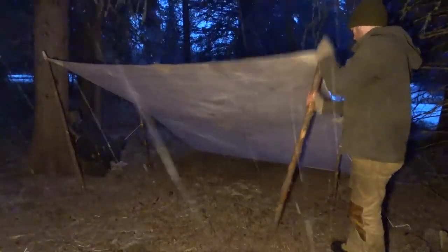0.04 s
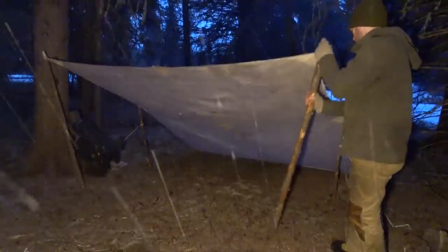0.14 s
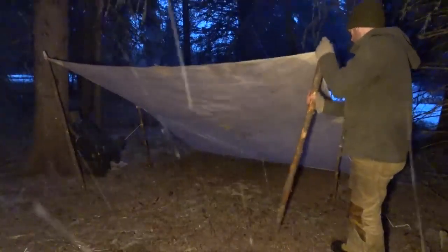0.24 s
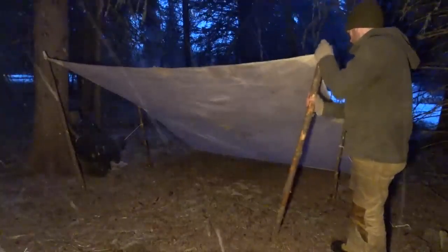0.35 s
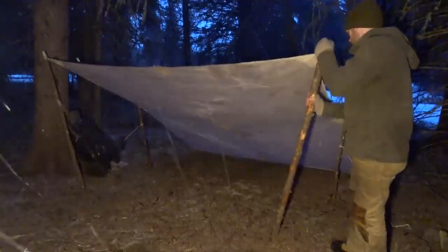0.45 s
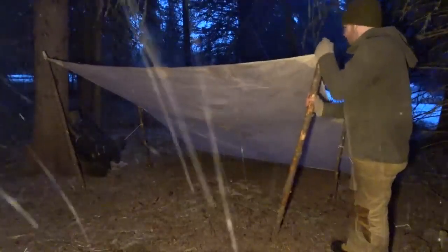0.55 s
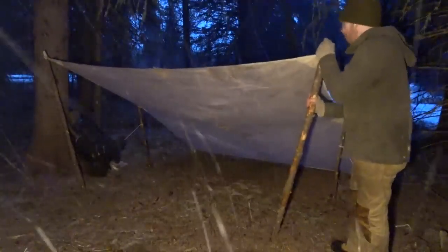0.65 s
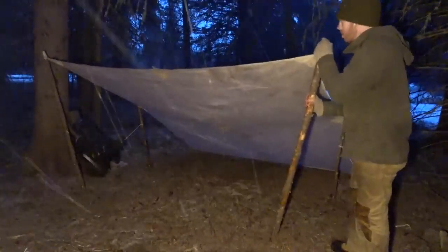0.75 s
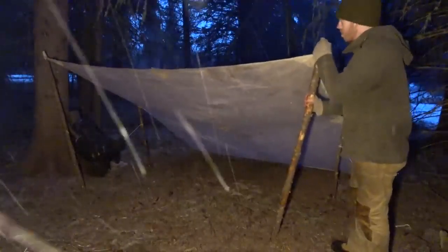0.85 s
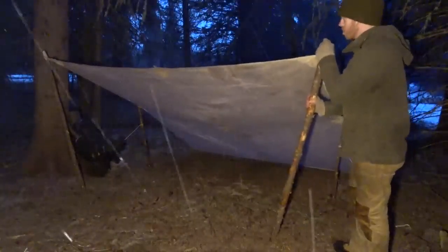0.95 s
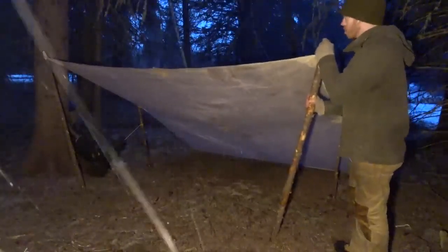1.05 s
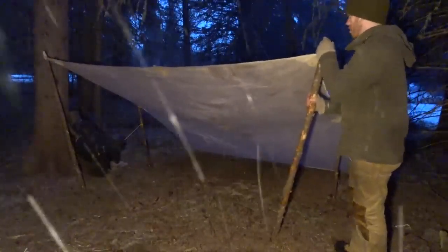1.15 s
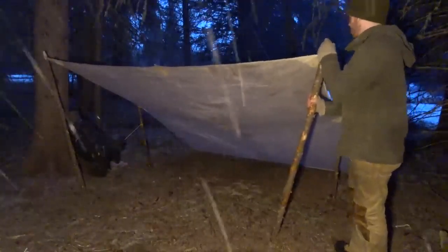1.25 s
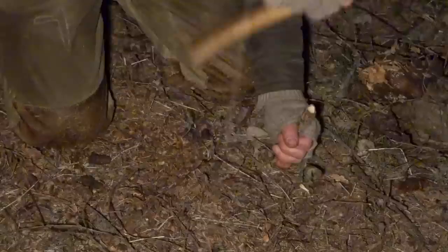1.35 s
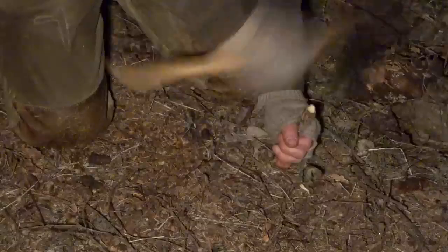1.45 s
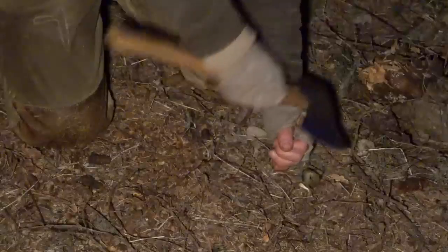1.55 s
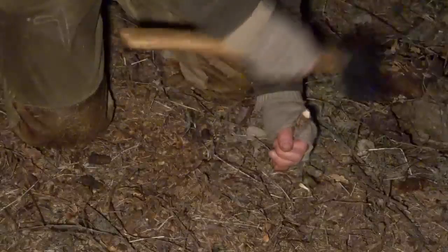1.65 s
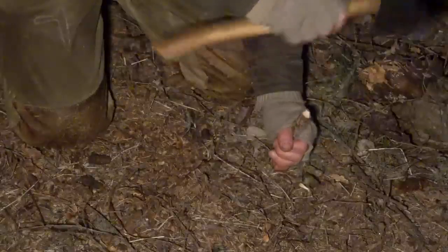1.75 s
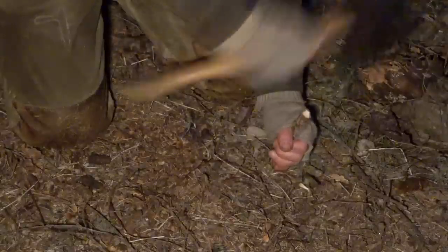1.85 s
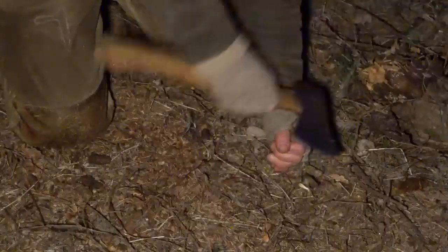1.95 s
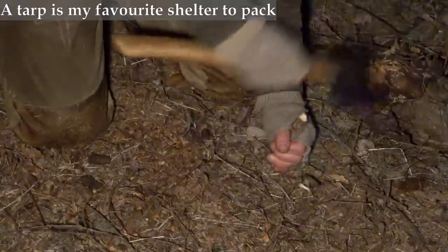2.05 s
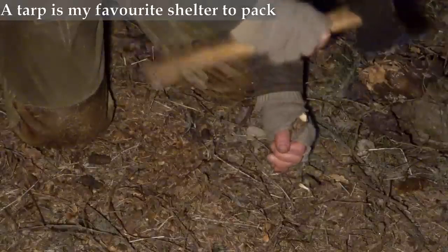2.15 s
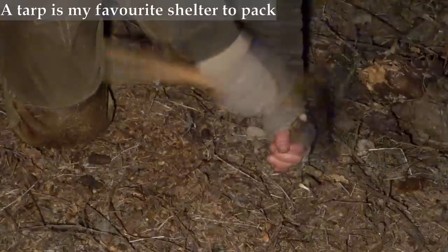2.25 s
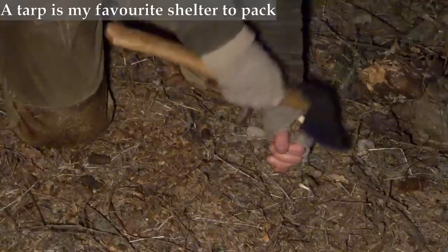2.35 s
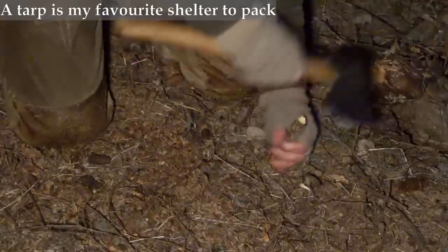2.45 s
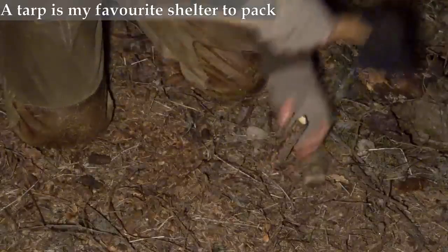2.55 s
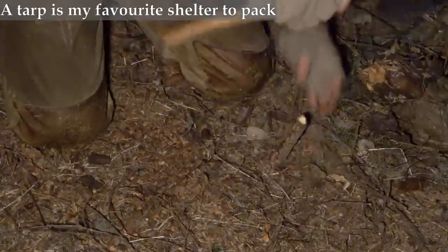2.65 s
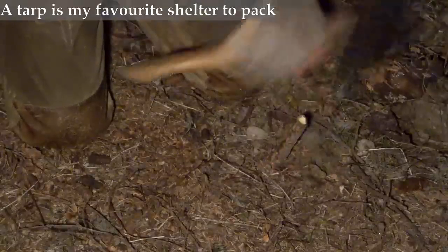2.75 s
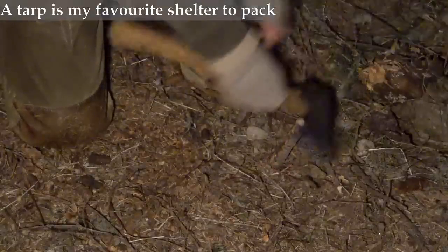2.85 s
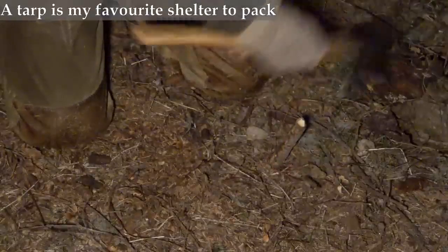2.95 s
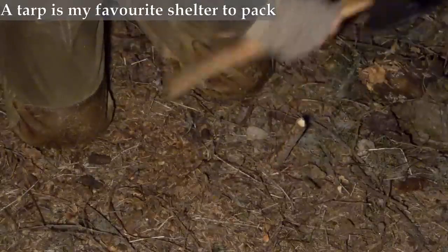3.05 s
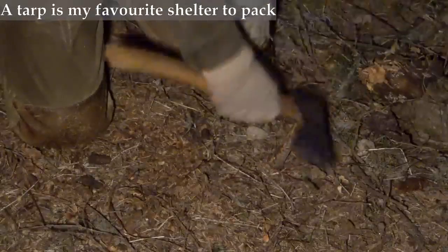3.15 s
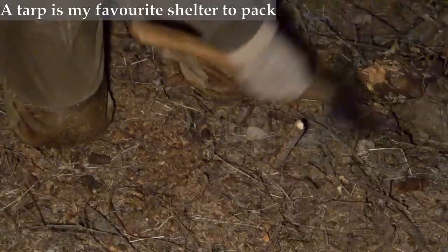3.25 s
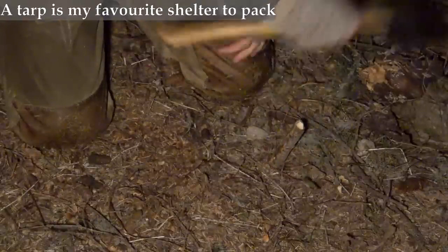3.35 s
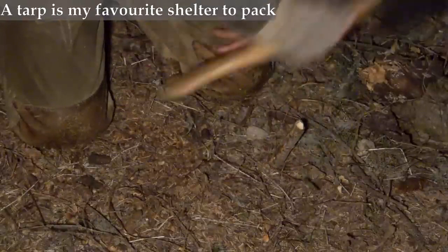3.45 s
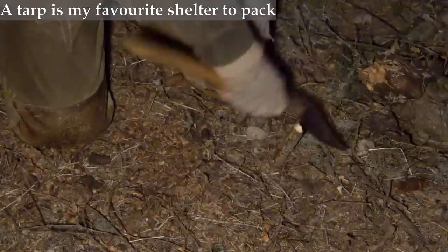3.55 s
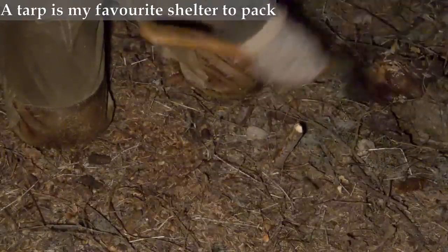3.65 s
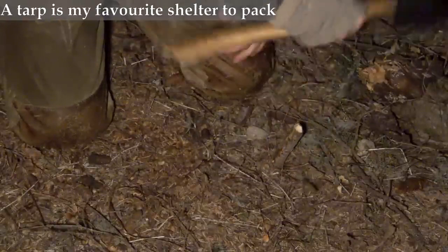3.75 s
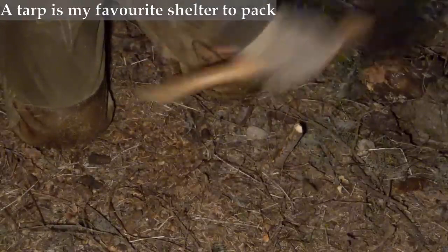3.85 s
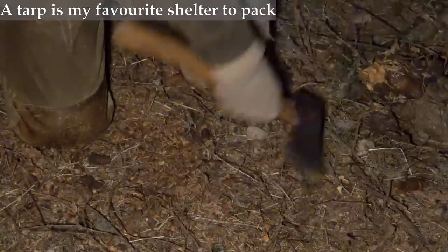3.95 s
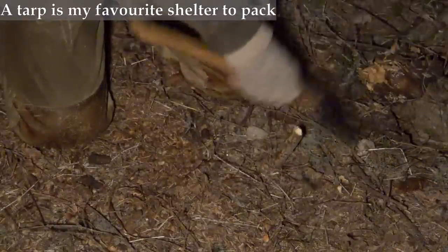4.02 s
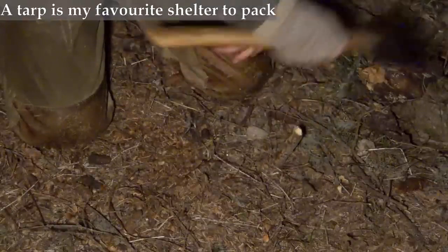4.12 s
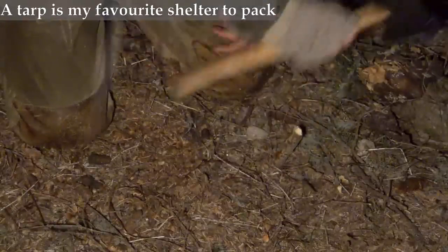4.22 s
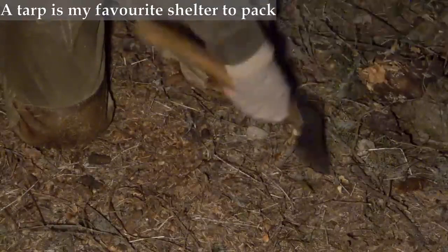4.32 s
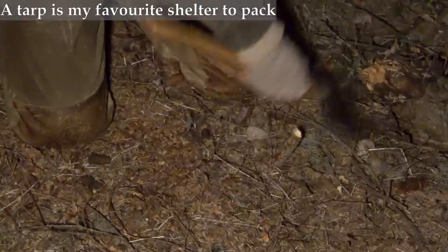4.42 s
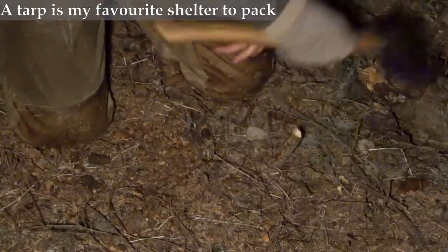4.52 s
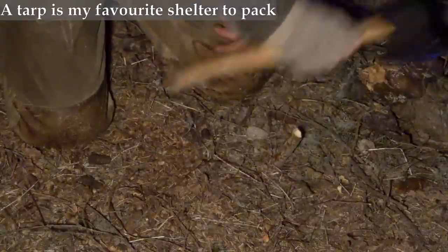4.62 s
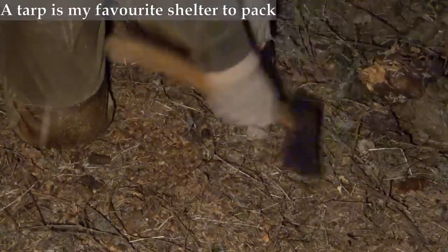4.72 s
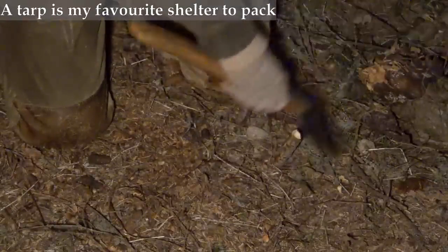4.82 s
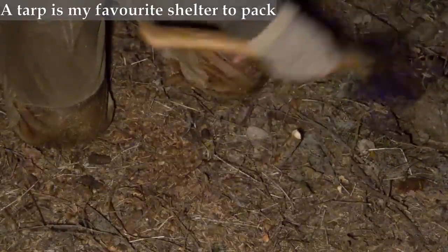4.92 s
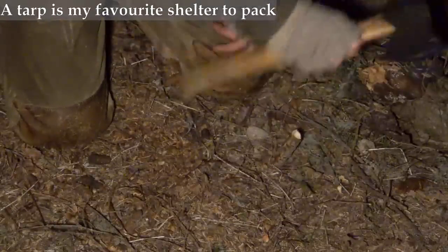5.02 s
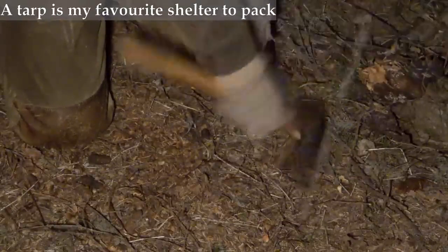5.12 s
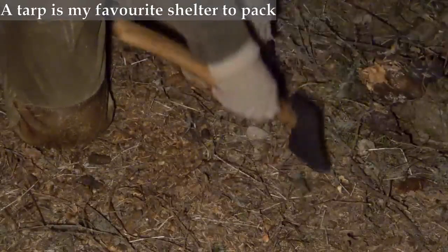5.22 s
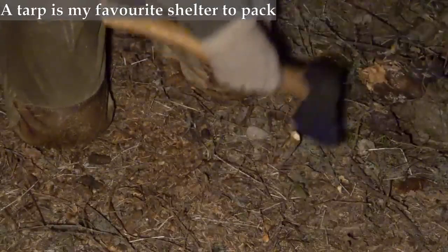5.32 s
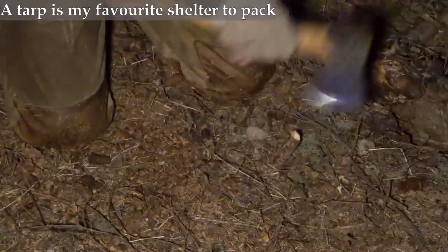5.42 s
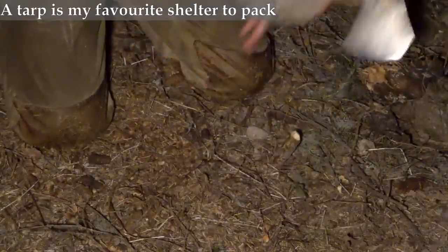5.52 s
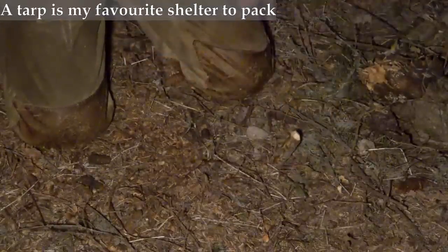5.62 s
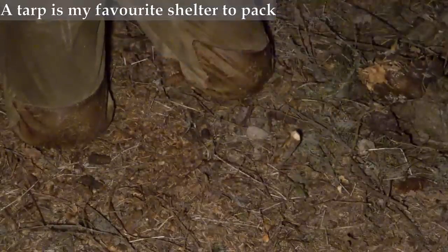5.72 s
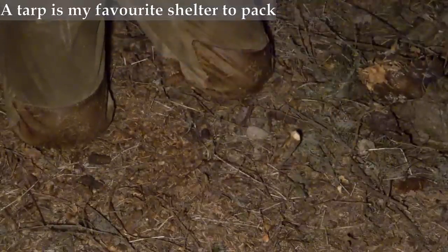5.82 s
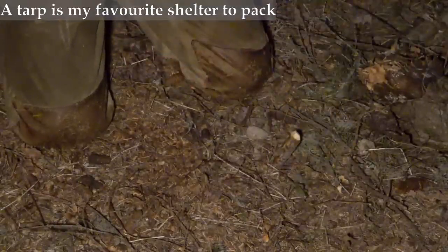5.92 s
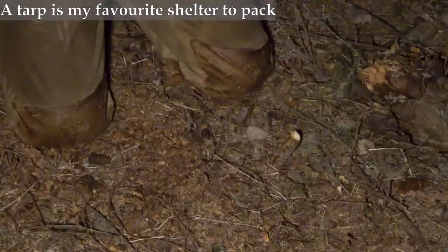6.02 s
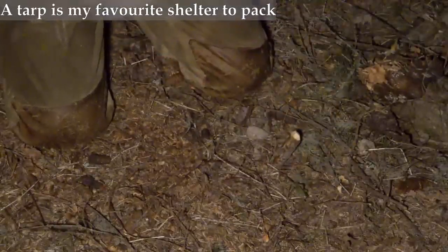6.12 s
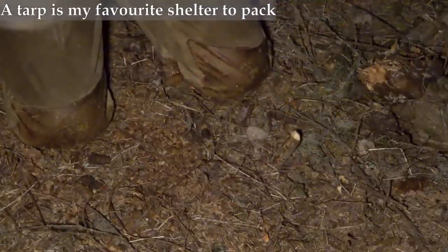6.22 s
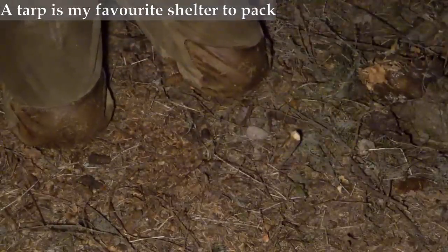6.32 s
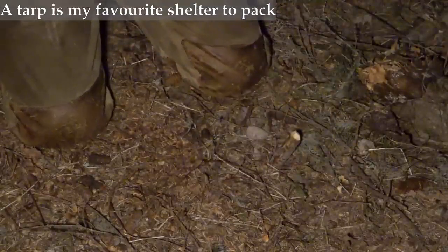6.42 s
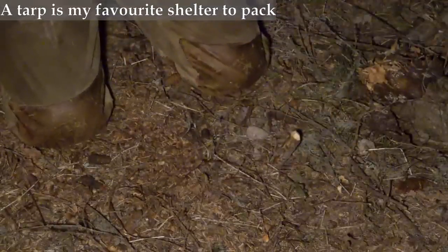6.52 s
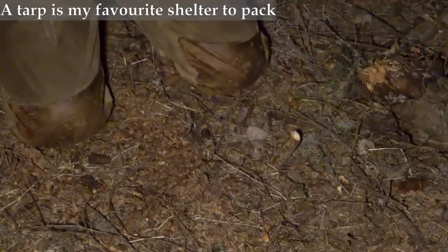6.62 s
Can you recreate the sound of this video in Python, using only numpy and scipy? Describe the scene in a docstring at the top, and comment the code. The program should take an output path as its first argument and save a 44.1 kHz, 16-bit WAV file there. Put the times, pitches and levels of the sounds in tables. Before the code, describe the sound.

Faint air and a low rumble of a quiet forest run throughout. At about 0.1 and 0.3 seconds twigs snap sharply and tarp cloth swishes, followed by a soft crunch of dry needles around 1 second. From 1.6 to 5.2 seconds the back of an axe drives a wooden stake with ten close, loud blows, roughly 0.4 seconds apart. Each has a wooden crack, a thump of soil and a low shudder through the microphone stand, overloading the microphone and leaving a faint, short echo among the trunks. The first four crack higher; after 3 seconds they become duller knocks. The steel head rings briefly, most clearly near 2.3, 2.9, 4.0, 4.8 and 5.2 seconds. A soft cloth swish comes at 2.6 seconds. From 5.5 seconds boots shift quietly on the ground, with small twig snaps near 6.5 seconds.

```python
"""Driving a stake in a winter forest at night.

Over faint air and a low rumble, twigs snap and cloth rustles by a tarp. Then, close up, the back of
an axe drives a wooden stake in ten blows. Each cracks the wood, rings the steel head, thumps the soil
and shakes the camera stand; the trunks scatter it back. The blows overload the microphone."""
import sys
import numpy as np
from scipy import signal
from scipy.fft import rfft, irfft, next_fast_len
from scipy.io import wavfile

SR = 44100
rng = np.random.default_rng(int(sys.argv[2]) if len(sys.argv) > 2 else 0)


def file_out(sig):
    """Save sig as 16-bit WAV at sys.argv[1]."""
    # one column per channel
    cols = np.atleast_2d(sig).T
    # limit, then scale
    lim = np.clip(cols, -1, 1)
    pcm = np.round(lim * 32767).astype(np.int16)
    wavfile.write(sys.argv[1], SR, pcm)


N = 294147
TIME = np.arange(N) / SR   # seconds since the scene began
AGE = np.arange(int(.7 * SR)) / SR   # seconds since one short sound began


def from_db(db):
    """Turn decibels into a number to multiply by."""
    return 10 ** (np.asarray(db) / 20)


def unit_level(x):
    """Scale a sound to an average (rms) level of 1."""
    return x / np.sqrt(np.mean(x ** 2) + 1e-20)


def add(track, s, sound):
    """Mix a sound in at s seconds."""
    at = int(round(s * SR))
    track[..., at:at + sound.shape[-1]] += sound[..., :N - at]


def later(x, s):
    """Delay a sound by s seconds, even by less than a sample."""
    return np.interp(np.arange(x.size) - s * SR, np.arange(x.size), x, left=0)


def fade(t60):
    """Die away from 1, losing 60 dB in the fade time of t60 seconds."""
    return np.exp(-np.log(1000) * AGE / t60)


def wide(shared, side, width_db):
    """Make stereo: add the side sound on the left and subtract it on the right."""
    return shared + from_db(width_db) * np.outer([1, -1], side)


def noise(tone, size):
    """Noise at level 1, shaped by rows of (frequency [Hz], level [dB])."""
    hz, db = np.transpose(tone)
    bins = np.maximum(np.fft.rfftfreq(size, 1 / SR), 1)
    colour = from_db(np.interp(np.log(bins), np.log(hz), db))
    return unit_level(irfft(rfft(rng.standard_normal(size)) * colour, size))


# Tone of the air that both sides share: (frequency [Hz], level [dB])
AIR_TONE = [(88, -32), (150, -4.5), (368, -5.5), (837, -11.5), (1690, -16.5), (1980, -17), (2180, -18),
            (2760, -20), (11300, -27), (16000, -31.5)]
# Tone of the hiss that differs between left and right: (frequency [Hz], level [dB])
AIR_SIDE_TONE = [(100, -9), (400, -7), (1500, -17.5), (4000, -21.5), (10000, -25), (16000, -28.5)]
# Tone of the rumble: (frequency [Hz], level [dB])
RUMBLE_TONE = [(8.8, -30), (15, 6), (81, 0.5), (151, -8), (188, -9.5), (269, -17), (344, -20), (400, -21.5),
               (520, -41), (880, -120)]
# How loud the background is: (time [s], air [dB], rumble [dB])
BACKGROUND_LEVELS = [(0, -53.5, -49.5), (1.35, -53.5, -46), (1.499, -57, -48), (2.999, -56.5, -50),
                     (5.398, -60, -51.5), (6.67, -55, -52)]

def background():
    """Faint air in the trees, and a low rumble that differs between left and right."""
    s, air_db, rumble_db = np.transpose(BACKGROUND_LEVELS)
    air = wide(noise(AIR_TONE, N), noise(AIR_SIDE_TONE, N), width_db=-2.5)
    rumble = wide(noise(RUMBLE_TONE, N), noise(RUMBLE_TONE, N), width_db=-5)
    return from_db(np.interp(TIME, s, air_db)) * air + from_db(np.interp(TIME, s, rumble_db)) * rumble


# Tone of the echo off the forest floor and tarp: (frequency [Hz], level [dB])
GROUND_ECHO_TONE = [(100, -3.5), (500, -3.5), (1500, -3), (2800, -3), (4500, -3.5), (8000, -4.5),
                    (16000, -5.5)]
# Tone of the echo off the trunks: (frequency [Hz], level [dB])
TRUNK_ECHO_TONE = [(100, -10.5), (700, -12), (1300, -1.5), (1900, 2), (2800, -8), (4000, -5.5),
                   (6500, -14.5), (16000, -22)]
# Single echoes from nearby trees: (delay [s], level [dB])
TREE_ECHOES = [(.062, -53), (0.106, -57), (.146, -63), (0.204, -66.5)]

def forest_echo(sound, build_s=.0058, smear_s=.006):
    """The ground scatters back a quick echo, the trunks a longer, duller one."""
    echo = 0
    build_up = 1 - np.exp(-(AGE / build_s) ** 2)
    for tone, db, t60 in [(GROUND_ECHO_TONE, -22, .17), (TRUNK_ECHO_TONE, -38, .76)]:
        tail = wide(noise(tone, AGE.size), noise(tone, AGE.size), width_db=-2) * fade(t60) * build_up
        echo += from_db(db) * tail / np.linalg.norm(tail)
    bark_tone = [(600, -20), (2000, 0), (4000, 0), (16000, -20)]
    for delay_s, db in TREE_ECHOES:   # rough bark smears each echo a little
        smear = noise(bark_tone, AGE.size) * np.exp(-((AGE - delay_s) / smear_s) ** 2)
        echo += from_db(db) * smear / np.linalg.norm(smear)
    return signal.fftconvolve(sound[None], echo, axes=1)[:, :N]


def swells(rows):
    """A loudness curve that rises and falls smoothly once for each row."""
    power = 0
    for middle_s, half_s, db in rows:
        bell = np.exp(-np.minimum(((TIME - middle_s) / half_s) ** 2, 20))
        power += (from_db(db) * bell) ** 2
    return np.sqrt(power)


def friction(hz, octaves, grain_db, floor_db, grain_s=.0012, top_hz=13000):
    """Rubbing makes a grainy stereo hiss, strongest around hz."""
    size = next_fast_len(N)
    bins = np.maximum(np.fft.rfftfreq(size, 1 / SR), 1)
    hump = np.exp(-.5 * (np.log2(bins / hz) / octaves) ** 2)
    colour = (from_db(floor_db) + hump) / np.hypot(1, (bins / top_hz) ** 2)
    shared, side = irfft(rfft(rng.standard_normal((2, size))) * colour, size)[:, :N]
    jitter = np.clip(rng.standard_normal(N), -2, 2)
    grains = from_db(grain_db * np.interp(TIME / grain_s, np.arange(N), jitter))
    return unit_level(wide(shared, side, width_db=-13.5) * grains)


# Swishes of cloth: (middle [s], half length [s], level [dB])
CLOTH_SWISHES = [(0.093, 0.013, -31), (0.216, 0.035, -49.5), (0.301, 0.015, -36.5), (0.333, 0.026, -40),
                 (0.482, .05, -53), (1.241, .025, -52), (2.615, 0.081, -46.5), (6.52, .05, -57.5)]

def cloth():
    """Cloth rubs in short, soft swishes."""
    return swells(CLOTH_SWISHES) * friction(hz=2430, octaves=.85, grain_db=3.5, floor_db=-14.5)


# How loud the boots are: (time [s], level [dB])
BOOT_LEVELS = [(5.53, -70), (5.585, -49), (5.68, -55.5), (5.74, -52), (5.84, -58.5), (6.4, -59),
               (6.51, -49), (6.67, -66)]

def boots():
    """Boots shift on the soft forest floor after the last blow."""
    loudness = from_db(np.interp(TIME, *np.transpose(BOOT_LEVELS), left=-np.inf))
    return loudness * friction(hz=910, octaves=1.12, grain_db=2.5, floor_db=-21.5)


# Crunches of dry needles: (middle [s], half length [s], level [dB])
NEEDLE_CRUNCHES = [(1.04, 0.19, -58.5), (2.63, 0.057, -55), (5.903, 0.022, -57), (6.442, 0.014, -46),
                   (6.48, .12, -60.5)]
# Tone of one breaking needle: (frequency [Hz], level [dB])
TICK_TONE = [(500, -14.5), (2500, -8.5), (6000, 0), (11000, -3), (16000, -15.5)]

def needles(ticks_per_s=40, tick_db=15.5, spread_db=4):
    """Dry needles crunch, and single ones break at random with a tick."""
    loudness = swells(NEEDLE_CRUNCHES)
    crunch = loudness * friction(hz=6060, octaves=1.4, grain_db=3.6, floor_db=-16)
    breaks = rng.random(N) < ticks_per_s / SR
    strengths = loudness * from_db(tick_db + spread_db * rng.uniform(-1, 1, N))
    tick = noise(TICK_TONE, AGE.size) * fade(t60=.008)
    return crunch + signal.fftconvolve(breaks * strengths, tick)[:N]


# Twigs breaking: (time [s], level [dB])
TWIG_SNAPS = [(0.0906, -17.5), (0.095, -23), (0.288, -30.5), (0.308, -28.5), (0.941, -40), (1, -44),
              (1.115, -47), (6.430, -38), (6.481, -44), (6.502, -36.5)]
# Tone of one snap: (frequency [Hz], level [dB])
TWIG_TONE = [(200, -9.5), (500, -3.5), (1000, -18.5), (2600, 2.5), (4500, -11), (9000, -12), (16000, -44)]

def twigs():
    """Each twig snaps with a tiny burst of noise."""
    out = np.zeros((2, N))
    for s, db in TWIG_SNAPS:
        burst = wide(noise(TWIG_TONE, AGE.size), noise(TWIG_TONE, AGE.size), width_db=-10)
        add(out, s, from_db(db) * burst * fade(t60=.015))
    return out


# The ways the stand wobbles on soft ground:
# (pitch [Hz], left level [dB], right level [dB], fade time [s], rise time [s], right delay [s])
STAND_WOBBLES = [(41.4, -21, -36, 0.84, 0.017, 0.0022), (45.4, -32, -37.5, 0.34, .03, 0.0027),
                 (57, -34, -43, .4, 0.034, .004), (62.84, -29, -32, 0.53, 0.064, 0.0022),
                 (83.5, -36, -32.5, 0.14, .02, 0.0022), (96, -14.5, -19.5, 0.36, 0.0043, 0.0044),
                 (112, -17, -23.5, 0.095, 0.0032, 0.0037), (135, -25, -20.5, 0.12, 0.0035, 0.0042)]

def camera_stand():
    """Each blow runs through the ground and shakes the stand; left and right move differently."""
    wobble, out = 0, np.zeros((2, N))
    for hz, left_db, right_db, t60, rise_s, delay_s in STAND_WOBBLES:
        sway = np.sin(2 * np.pi * hz * AGE) * fade(t60) * (1 - np.exp(-AGE / rise_s))
        wobble += np.array([from_db(left_db) * sway, from_db(right_db) * later(sway, delay_s)])
    for s, *_ in AXE_BLOWS:
        add(out, s, wobble)
    return out


def ring(notes):
    """A struck object rings with several fading notes, each a little different in level every time."""
    return sum(from_db(db + .5 * rng.normal()) * np.sin(2 * np.pi * hz * AGE) * fade(t60)
               for hz, db, t60 in notes)


def grip_gain(grip, loose_db, firm_db):
    """A level that follows the ground's grip on the stake, from 0 (loose) to 1 (firm)."""
    return from_db(loose_db + grip * (firm_db - loose_db))


def thud(hz, sag=.25, sag_s=.03, rise_s=.011):
    """The stake bounces on the soil; its pitch sags as the soil gives way."""
    pitch = hz * (1 - sag * (1 - np.exp(-AGE / sag_s)))
    return 2 * np.sin(2 * np.pi * np.cumsum(pitch) / SR) * fade(t60=.03) * (1 - np.exp(-AGE / rise_s))


# Low notes of the soil: (pitch [Hz], level [dB], fade time [s])
SOIL_NOTES = [(230, -26, 0.044), (281, -15, 0.045)]

def soil(blow, grip, thud_hz, db_per_blow=.99):
    """The soil thumps, and rings more strongly as each blow packs it down."""
    bounce = grip_gain(grip, loose_db=1.5, firm_db=-1) * thud(thud_hz)
    return bounce + from_db(-2.5 + db_per_blow * blow) * ring(SOIL_NOTES)


# The axe head's lowest note and its faint lingering ping: (pitch [Hz], level [dB], fade time [s])
STEEL_LOW_NOTES = [(2791, -2.5, 0.077), (2812, -41, 0.4425)]
# Its higher notes: (pitch [Hz], level [dB], fade time [s])
STEEL_HIGH_NOTES = [(6533, 0.5, .1), (7630, -12, 0.046), (3770, -21.5, 0.055)]

def axe_head(steel_db, grip, contact_s=.0026):
    """The steel head bends and rings freely once it has bounced off the stake."""
    low = from_db(steel_db) * ring(STEEL_LOW_NOTES)
    high = grip_gain(grip, loose_db=-11, firm_db=-22) * ring(STEEL_HIGH_NOTES)
    return (low + high) * (1 - np.exp(-AGE / contact_s))


# Tone of cracking wood and grit: (frequency [Hz], level [dB])
CRACK_TONE = [(100, -10), (400, 0), (1300, 0), (2500, 1), (4000, -14), (8000, -17), (16000, -32.5)]

def crack(burst_db=1.5, burst_t60=.018, grit_db=-28.5):
    """Wood fibres crush in a short burst with no clear pitch, and grit scrapes the sinking stake."""
    hz, db = np.transpose(CRACK_TONE)
    bins = np.fft.rfftfreq(AGE.size, 1 / SR) + 1
    colour = from_db(np.interp(np.log(bins), np.log(hz), db))
    fibres = rfft(rng.standard_normal(AGE.size) * fade(burst_t60))
    timing = fibres / np.abs(fibres)   # still random, but equally strong at every frequency
    burst = irfft(colour * timing, AGE.size) * fade(10 * burst_t60)
    burst *= np.linalg.norm(fade(burst_t60)) / np.linalg.norm(burst)
    grit = noise(CRACK_TONE, AGE.size) * fade(t60=.05)
    return from_db(burst_db) * burst + from_db(grit_db) * grit


def shaft_click(band_hz=(1500, 3300)):
    """The smooth click that the stake's shaft throws sideways into the trees."""
    band = signal.butter(2, band_hz, "band", fs=SR, output="sos")
    return from_db(20.5) * signal.sosfilt(band, (AGE == 0) + 1e-18)


# Notes in the stake's knock: (pitch [Hz], level [dB], fade time [s])
WOOD_NOTES = [(498, -10, 0.021), (714, -15.5, 0.019), (1290, -14.5, 0.028), (1442, -10.5, 0.016),
              (2033, -8, 0.016), (4155, -19, 0.021), (8064, -15, .01)]

def stake(blow, grip, firm_for_s):
    """The loose stake cracks high and loud; in firm ground it gives a duller knock."""
    loose_hz = 2959 - 47.6 * blow
    firm_hz = 1400 - 760 * np.exp(-firm_for_s / .5)   # climbs as the part above ground shortens
    shaft = (1 - grip) * ring([(loose_hz, 14.5, .014)]) + grip * ring([(firm_hz, 5.5, .0052)])
    crush = grip_gain(grip, loose_db=3, firm_db=-2.14) * crack()
    knock = grip_gain(grip, loose_db=-7.5, firm_db=3.5) * ring(WOOD_NOTES)
    return crush + knock + shaft


# Blows of the axe: (time [s], force [dB], steel ring [dB], thud pitch [Hz])
AXE_BLOWS = [(1.5656, -1, -17.5, 278.4), (1.985, 0.5, -22.5, 289), (2.3475, -1.5, 1.5, 427),
             (2.8858, -0.5, 6.5, 432), (3.2321, -1, -14.5, 427.4), (3.6121, 2, -18.5, 415),
             (3.9960, -0.5, -0.5, 451), (4.4011, -1, -15.5, 457.5), (4.7975, -1.5, 0, 280.4),
             (5.2088, 2, -2, 280)]
# Light extra touches of the axe: (time [s], crack [dB], thud [dB])
AXE_TOUCHES = [(1.624, -24.5, -32), (3.6154, -8.5, -26), (4.3898, -37, -35.5), (4.816, -13.5, -29.5),
               (5.2714, -23, -7.5)]

def hammering(firm_at_s=3.03, firming_s=.13):
    """The axe drives the stake into firm ground. Returns the close sound and the sideways clicks."""
    near, sideways = np.zeros((2, N))
    for blow, (s, force_db, steel_db, thud_hz) in enumerate(AXE_BLOWS):
        grip = .5 + .5 * np.tanh((s - firm_at_s) / firming_s)
        wood = stake(blow, grip, firm_for_s=max(s - firm_at_s, 0))
        hit = wood + axe_head(steel_db, grip) + soil(blow, grip, thud_hz)
        click = grip_gain(grip, loose_db=6, firm_db=2.5) * shaft_click()
        add(near, s, from_db(force_db) * hit)
        add(sideways, s, from_db(force_db) * click)
    soften = signal.butter(1, 3000, fs=SR, output="sos")   # dulls the treble above 3000 Hz
    for s, crack_db, thud_db in AXE_TOUCHES:
        soft_crack = signal.sosfilt(soften, crack())
        add(near, s, from_db(crack_db) * soft_crack + from_db(thud_db) * thud(hz=400))
    return near, sideways


def scene():
    """Mix everything; the blows reach the left side slightly louder and a hair later."""
    blows, sideways = hammering()
    rustles = cloth() + needles() + boots() + twigs()
    direct = np.array([from_db(1.2) * later(blows, 1e-5), from_db(-.4) * later(blows, 1e-6)])
    echo = forest_echo(blows + sideways + rustles[0])
    return direct + rustles + echo + camera_stand() + background()


def record(dry, treble_hz=17000, cutoff_hz=16000):
    """The blows overload the microphone and clip flat; the treble droops and the very top is cut."""
    clipped = np.clip(dry, -.97, .97)
    dulled = signal.sosfilt(signal.butter(1, treble_hz, fs=SR, output="sos"), clipped)
    return signal.sosfilt(signal.ellip(12, .1, 100, cutoff_hz, fs=SR, output="sos"), dulled)


dry = scene()
out = record(dry)
file_out(out)
```